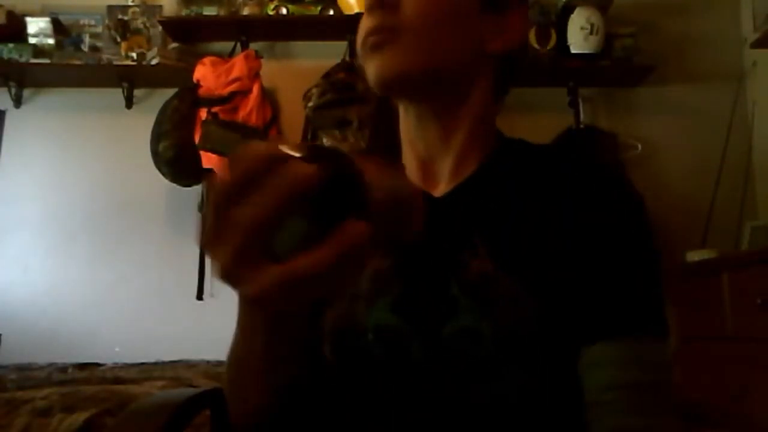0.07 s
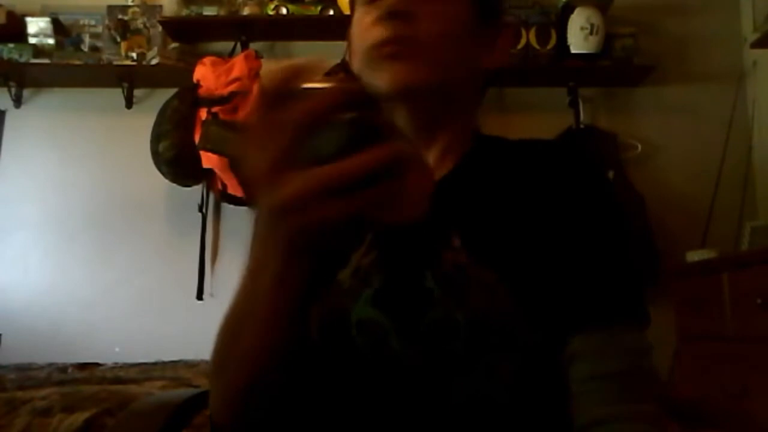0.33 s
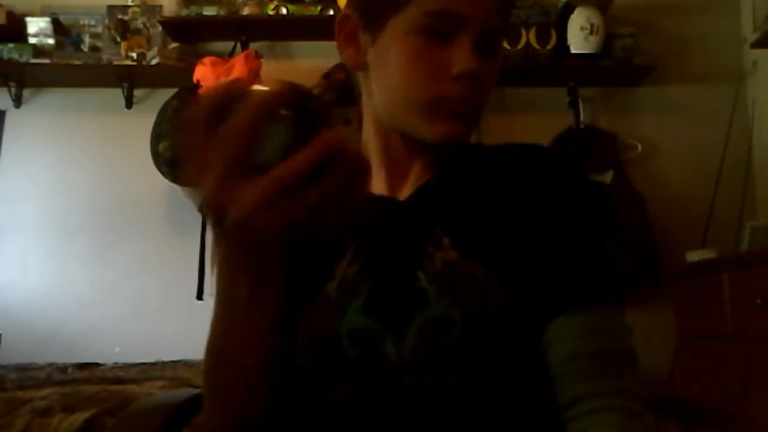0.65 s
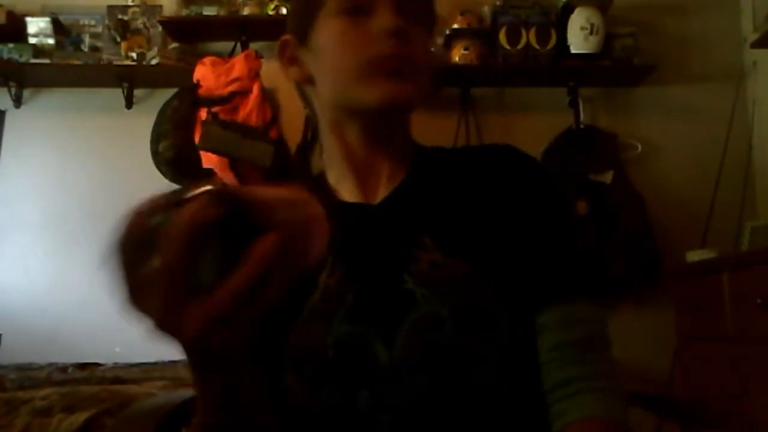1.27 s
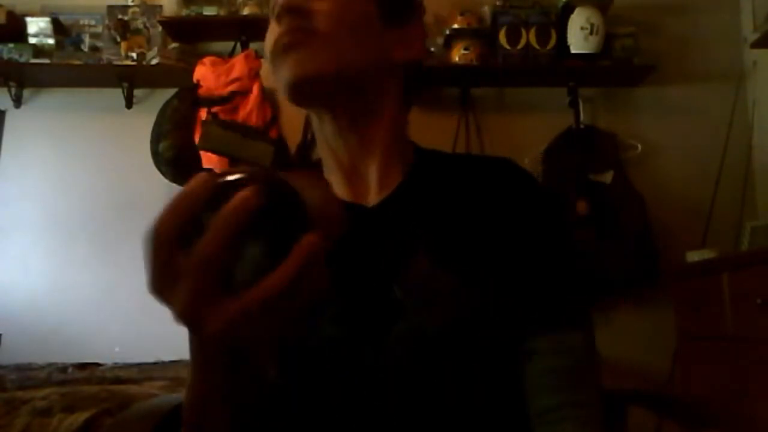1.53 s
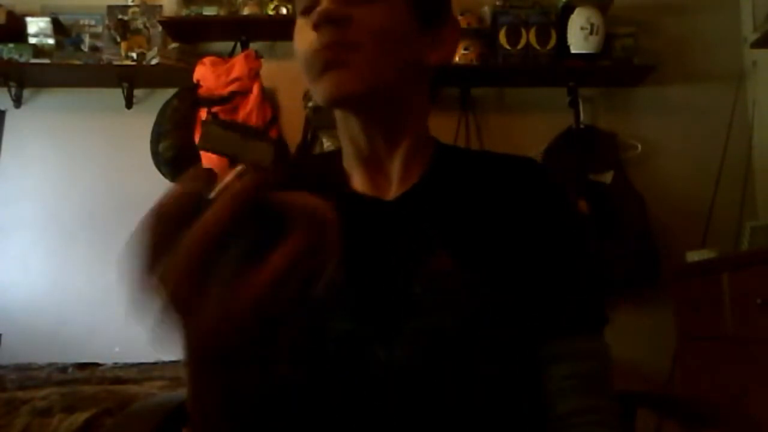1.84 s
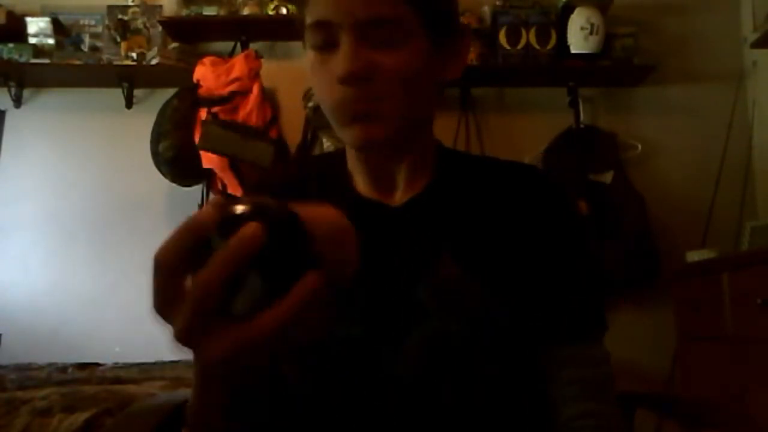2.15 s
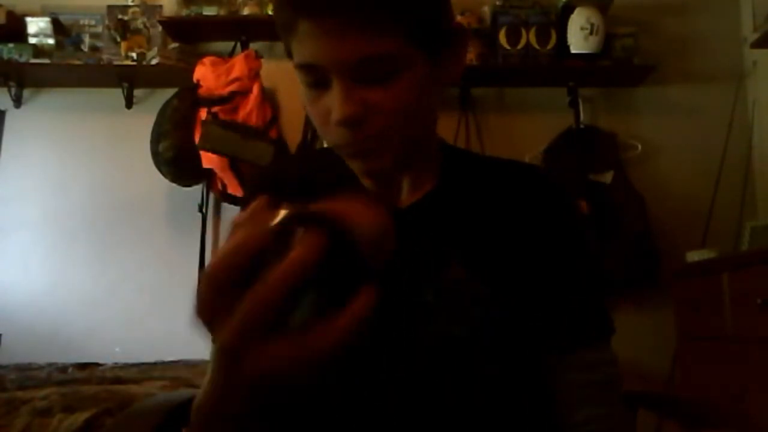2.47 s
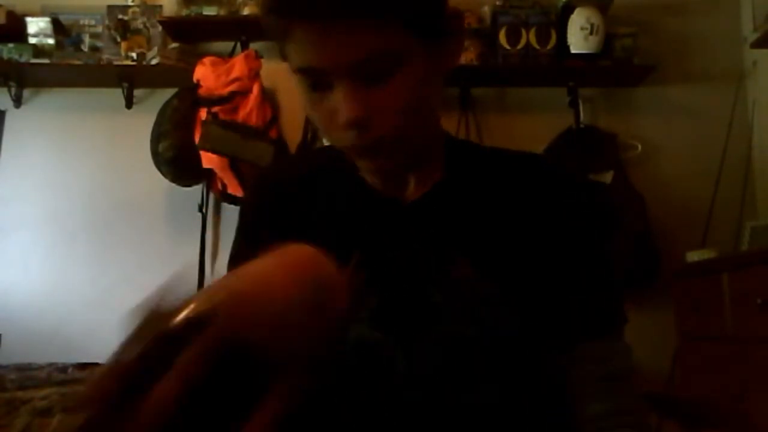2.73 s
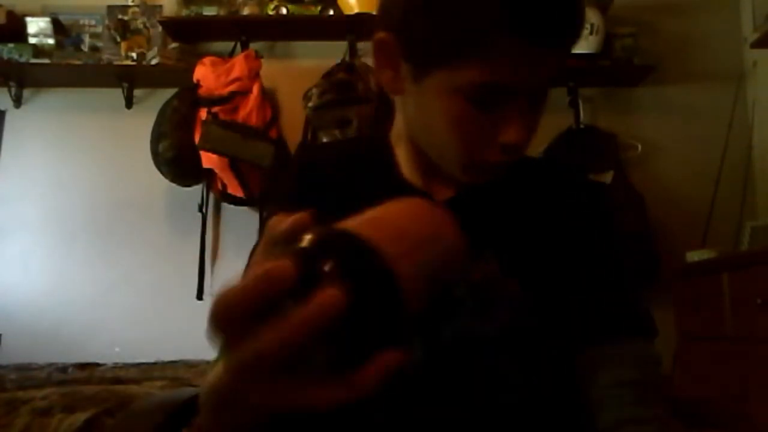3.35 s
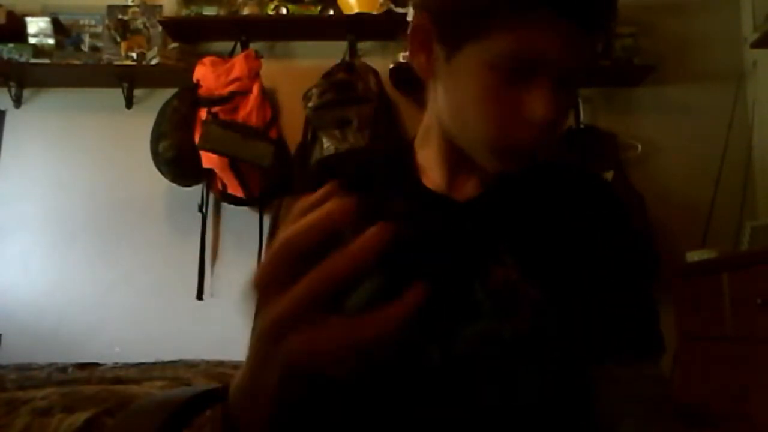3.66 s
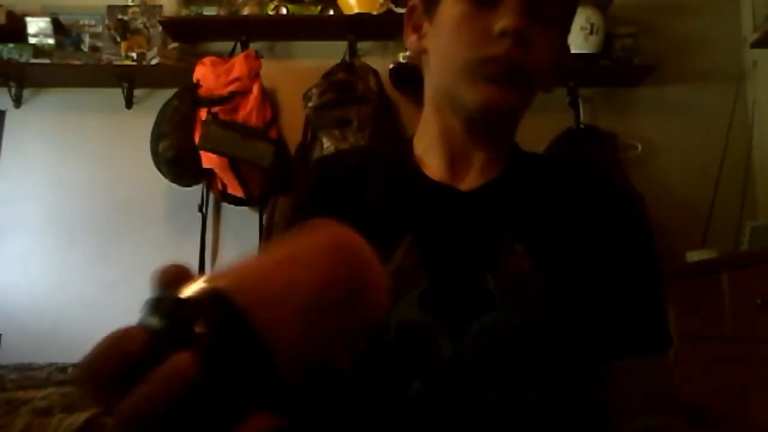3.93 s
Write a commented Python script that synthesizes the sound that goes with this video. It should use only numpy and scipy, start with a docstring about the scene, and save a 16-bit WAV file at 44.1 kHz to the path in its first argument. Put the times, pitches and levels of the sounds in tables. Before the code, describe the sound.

Rhythmic rattling and sloshing from a hand-held container shaken rapidly in a quiet room.

```python
"""A sharp, splashing rattle, about five times a second: a hand-held container shaken in a small, quiet room.
At each turn inertia throws the contents against one end, where many tiny impacts and a few hard knocks
excite the wall's resonance near 2 kHz. The return strokes are softer. Lower down, bubbles drive the
resonances of the liquid and the trapped air, which churn and gulp. Foam fizzes more and more and the hand
thumps now and then, over room noise, a low rumble and a faint sinking tone."""
import sys
import numpy as np
from scipy import signal
from scipy.fft import rfft, irfft
from scipy.io import wavfile
from scipy.ndimage import uniform_filter1d

SR = 44100
rng = np.random.default_rng(int(sys.argv[2]) if len(sys.argv) > 2 else 0)


def materialize(psi):
    """Save the field psi as 16-bit PCM at rate SR to the path in sys.argv[1].

    A 1-D psi becomes a single channel; in a 2-D psi each row is a channel.
    """
    bounded = np.clip(np.atleast_2d(psi).T, -1, 1)
    quanta = np.round(bounded * 32767).astype(np.int16)
    wavfile.write(sys.argv[1], SR, quanta)


N = 176400

# forward strokes: peak t/s, rise/s, fall/s, relative rattle level/dB, relative slosh level/dB, wall f/Hz
FORWARD_STROKES = [(0.07, 0.016, 0.032, -33, -55.5, 2055), (0.27, 0.0083, 0.014, -29, -54, 2110),
                   (0.449, 0.01, 0.02, -30.5, -53.5, 1900), (0.652, 0.01, 0.024, -35, -51.5, 1900),
                   (0.834, 0.011, 0.037, -37, -54, 2020), (1.027, 0.0093, 0.019, -33, -52, 1984),
                   (1.21, 0.0095, 0.02, -32.5, -67, 2010), (1.387, 0.013, 0.013, -33.5, -50.5, 2070),
                   (1.566, 0.011, 0.018, -36, -50, 2020), (1.734, 0.011, 0.022, -38.5, -52, 1970),
                   (1.888, 0.011, 0.023, -37, -48.5, 2000), (2.064, 0.012, 0.021, -33.5, -47, 2090),
                   (2.26, 0.035, 0.017, -38, -47, 1990), (2.423, 0.012, 0.019, -36.5, -51.5, 1980),
                   (2.595, 0.0052, 0.019, -33, -53, 1900), (2.768, 0.013, 0.021, -34, -51, 1970),
                   (2.951, 0.03, 0.025, -38.5, -49.5, 1940), (3.135, 0.014, 0.013, -36.5, -50, 2000),
                   (3.328, 0.011, 0.023, -35, -52.5, 2005), (3.528, 0.0068, 0.035, -35.5, -45, 1990),
                   (3.726, 0.0087, 0.024, -32, -46.5, 2010), (3.918, 0.0072, 0.024, -31, -51, 2070)]
# return strokes: peak t/s, rise/s, fall/s, relative rattle level/dB, relative slosh level/dB
RETURN_STROKES = [(0.178, 0.014, 0.036, -42, -53), (0.371, 0.005, 0.014, -40, -55.5),
                  (0.558, 0.012, 0.043, -45.5, -49), (0.747, 0.0036, 0.04, -41.5, -48.5),
                  (0.923, 0.012, 0.056, -41.5, -52), (1.129, 0.044, 0.033, -44.5, -54.5),
                  (1.309, 0.038, 0.017, -44, -53), (1.497, 0.026, 0.017, -42.5, -52.5),
                  (1.648, 0.0035, 0.046, -43.5, -52.5), (1.824, 0.0076, 0.018, -42, -56),
                  (1.985, 0.013, 0.027, -43, -51), (2.147, 0.015, 0.022, -44, -53),
                  (2.327, 0.021, 0.03, -39.5, -50), (2.502, 0.019, 0.048, -42, -49),
                  (2.691, 0.018, 0.024, -41.5, -57), (2.852, 0.011, 0.02, -42, -53),
                  (3.035, 0.0022, 0.018, -38.5, -56.5), (3.245, 0.029, 0.018, -40.5, -46.5),
                  (3.428, 0.0025, 0.034, -44, -50), (3.639, 0.011, 0.058, -46.5, -52),
                  (3.837, 0.0045, 0.038, -44, -51)]
RETURN_HZ, IMPACTS_PER_S = 1992, 2000
def rattle():
    """Superposition of impacts: at each turn heavy drops ring the wall and light spray ticks against it."""
    drops, power = np.zeros(N), np.zeros(N)
    t = np.arange(-SR // 8, SR // 4) / SR
    crest = .75  # saturation rounds the top of each splash
    for at, rise, fall, db, _, hz in list(FORWARD_STROKES) + [(*row, RETURN_HZ) for row in RETURN_STROKES]:
        force = undb(db + 2) * crest * np.tanh(swell(t, rise, fall) / crest)
        impacts = force * swarm(len(t), IMPACTS_PER_S, spread_db=4.5)
        add(drops, at + t[0], ring(impacts, wall(hz)))
        add(power, at + t[0], force ** 2)
    return drops + undb(-9.5) * np.sqrt(power) * spray()


# spectrum of a drop striking the wall: f/Hz, relative level/dB
WALL_SPECTRUM = [(200, -50), (500, -26.5), (1000, -20), (1400, -22), (1750, -3), (2000, -6.5), (2250, -4.5),
                 (2650, -10.5), (3600, -10.5), (4300, -13.5), (5400, -30.5), (8000, -37.5), (15000, -65)]
WALL_HZ, WALL_DECAY_S = 2019, .0045
def wall(hz):
    """Impulse response of the wall to one drop: a broadband clack plus one exponentially damped mode."""
    clack = response(WALL_SPECTRUM, hz / WALL_HZ)
    t = np.arange(len(clack)) / SR
    mode = np.exp(-t / WALL_DECAY_S) * np.cos(2 * np.pi * hz * t)
    return unit_energy(clack + undb(-8) * unit_energy(mode))


# hard blows on the wall: t/s, peak level/dB, wall f/Hz
KNOCKS = [(0.0668, -17.0, 2140.0), (0.0716, -19.0, 2140.0), (0.0757, -23.0, 2040.0),
          (0.1764, -27.5, 1890.0), (0.2686, -12.5, 1950.0), (0.272, -20.0, 2070.0), (0.4467, -16.0, 1850.0),
          (0.4564, -19.0, 1950.0), (0.6546, -24.0, 2030.0), (0.7445, -32, 1800), (0.831, -20.0, 2060.0),
          (0.8352, -15.0, 2140.0), (1.0239, -21.0, 2090.0), (1.0315, -20.0, 1980.0),
          (1.1286, -27.0, 2000.0), (1.1982, -25.0, 1970.0), (1.209, -19.0, 1990.0), (1.2123, -14.0, 2020.0),
          (1.5653, -25.0, 2000.0), (1.8205, -28.0, 2030.0), (1.9844, -30.0, 2100.0),
          (2.0622, -22.0, 2040.0), (2.242, -20.0, 2060.0), (2.3241, -28.0, 1850.0), (2.4197, -25.0, 1850.0),
          (2.5001, -26.0, 2210.0), (2.5059, -27.0, 1980.0), (2.5863, -26.0, 2020.0),
          (2.5946, -22.0, 1960.0), (2.599, -21.0, 2010.0), (2.7744, -22.0, 1950.0), (2.8486, -28.0, 2060.0),
          (3.0237, -30, 1920), (3.3128, -27.0, 1810.0), (3.7155, -21.0, 2000.0), (3.9145, -21.0, 1930.0)]
# spectrum of a hard blow: f/Hz, relative level/dB
KNOCK_SPECTRUM = [(200, -48), (800, -31), (1350, -16), (1700, -5.5), (2000, 11), (2300, 0.5), (2800, -20),
                  (3700, -1.5), (4600, -44), (5500, -22.5), (9000, -42), (16000, -71)]
CONTACT_S = .00035
def knocks():
    """Free vibration of the hand-damped wall after a blow; cushioning by the liquid softens the onset."""
    out = np.zeros(N)
    for at, db, hz in KNOCKS:
        knock = response(KNOCK_SPECTRUM, hz / WALL_HZ)
        t = np.arange(len(knock)) / SR
        knock *= 1 - np.exp(-(t / CONTACT_S) ** 2)
        add(out, at, undb(db) * knock / np.abs(knock).max())
    return out


# impacts of stray pieces: t/s, relative peak level/dB, f/Hz
TICKS = [(0.4289, -25, 3400), (0.5824, -38, 4500), (0.6409, -29, 3400), (0.755, -33, 4200),
         (1.0236, -21, 3740), (1.3683, -29, 3870), (1.6482, -32, 3600), (2.3057, -29, 3300),
         (2.5406, -30, 4600), (2.5858, -26, 3700), (2.7536, -25, 3600), (3.0929, -34, 3700),
         (3.2051, -31, 3050), (3.4291, -28, 3350), (3.489, -32, 3410), (3.5309, -27, 4230)]
# spectrum of a light impact: f/Hz, relative level/dB
TICK_SPECTRUM = [(600, -32), (2300, -12), (3500, 0), (4300, -7), (5400, -26), (8000, -42), (14000, -64)]
TICK_HZ = 3500
def ticks():
    """Impulse excitation: each light stray piece strikes once and gives a short, bright tick."""
    out = np.zeros(N)
    for at, db, hz in TICKS:
        tick = response(TICK_SPECTRUM, hz / TICK_HZ)
        add(out, at, undb(db - 1.5) * tick / np.abs(tick).max())
    return out


def spray(per_s=450, pitches=8, pitch_spread=.2):
    """Incoherent addition: sparse ticks of several pitches sum in power to an rms near 1."""
    shifts = 1 + pitch_spread * np.linspace(-1, 1, pitches)
    streams = (ring(swarm(N, per_s / pitches, spread_db=3.5), response(TICK_SPECTRUM, k)) for k in shifts)
    return sum(streams) / np.sqrt(pitches)


# modes of the churning liquid: f/Hz, bandwidth/Hz, relative level/dB
LIQUID_MODES = [(680.6, 74, -1), (788, 96, -1), (908, 95, -2), (986.5, 22, 2.5), (1005, 85, -2.5),
                (1195, 116, 3), (1292, 263, -1), (1640, 150, -5)]
BUBBLES_PER_S, BUBBLE_SPREAD_DB = 1400, 3.5
def slosh():
    """Forced vibration: bursting bubbles drive the modes of the liquid, hardest just after each stroke."""
    strength = surge(lag_s=.0028, rise_s=.016, fall_s=.018, churn_db=0)
    bubbles = strength * swarm(N, BUBBLES_PER_S, BUBBLE_SPREAD_DB)
    return ring(bubbles, resonances(LIQUID_MODES, low_hz=495, high_hz=2400))


# modes of the air above the liquid: f/Hz, bandwidth/Hz, relative level/dB
AIR_MODES = [(298, 18.5, -10.5), (390.2, 19.6, -4), (418, 23.5, -3.5), (478.6, 13.7, -0.5),
             (515.7, 14.2, 3.5), (586.8, 15.4, 5.5)]
# strength of the gulp relative to the slosh: t/s, level/dB
GULP_LEVEL = [(0, -1), (.8, -5.5), (1.6, -2), (2.1, -9.5), (2.4, -3.5), (4, -3)]
def gulps():
    """Cavity resonance: bubbles excite the trapped air, which answers with a hollow gulp."""
    strength = surge(lag_s=.0085, rise_s=.022, fall_s=.015, churn_db=-8) * gain_curve(GULP_LEVEL)
    bubbles = strength * swarm(N, BUBBLES_PER_S, BUBBLE_SPREAD_DB)
    return ring(bubbles, resonances(AIR_MODES, low_hz=270, high_hz=607))


# churning between strokes: t/s, relative level/dB
CHURN_LEVEL = [(0, -53.5), (1.5, -54), (3, -56.5), (4, -64.5)]
def surge(lag_s, rise_s, fall_s, churn_db):
    """Addition of powers: the amplitude of the liquid's sound, a swell per stroke over a fading churn."""
    t = np.arange(N) / SR
    power = (gain_curve(CHURN_LEVEL) * undb(churn_db)) ** 2
    for at, _, _, _, db, *_ in list(FORWARD_STROKES) + list(RETURN_STROKES):
        power += (undb(db + 1.5) * swell(t - at - lag_s, rise_s, fall_s)) ** 2
    return np.sqrt(power)


# clusters of large bubbles: t/s, f/Hz, level/dB
GLUGS = [(0.197, 690, -45), (0.778, 700, -46), (0.924, 1055, -43), (2.12, 1150, -43), (2.335, 690, -44),
         (3.143, 1080, -43.5), (3.35, 470, -49), (3.736, 1200, -45)]
def glugs(relative_bandwidth=.22):
    """Bubble resonance: large bubbles of about one size burst together and share one band of pitch."""
    out = np.zeros(N)
    t = np.arange(-SR // 16, SR // 8) / SR
    for at, hz, db in GLUGS:
        mode = resonances([(hz, relative_bandwidth * hz, 0)], hz / np.sqrt(2), hz * np.sqrt(2))
        bubbles = unit_rms(ring(swarm(len(t), BUBBLES_PER_S, BUBBLE_SPREAD_DB), mode))
        add(out, at + t[0], undb(db) * swell(t, rise_s=.008, fall_s=.016) * bubbles)
    return out


# spectrum of the foam's crackle: f/Hz, relative level/dB
FIZZ_SPECTRUM = [(2000, -20), (4500, -1), (6500, 0), (8500, -2), (11000, -12), (16000, -36)]
# strength of the foam relative to the stroke: t/s, level/dB
FOAM_LEVEL = [(0, -38), (1.2, -34.5), (2.1, -29), (2.6, -27.5), (3.55, -29), (4, -25.5)]
def fizz():
    """Shot noise: foam builds up with the shaking and crackles in fine random pulses at each stroke."""
    t = np.arange(N) / SR
    strokes = list(FORWARD_STROKES) + list(RETURN_STROKES)
    force = sum(undb(db) * swell(t - at, rise_s=.016, fall_s=.025) for at, _, _, db, *_ in strokes)
    crackle = swarm(N, per_s=2500, spread_db=6) * force * gain_curve(FOAM_LEVEL)
    return ring(crackle, response(FIZZ_SPECTRUM))


# bumps of the arm and hand: t/s, half-width/s, level/dB
THUMPS = [(0.108, 0.0089, -51), (0.258, 0.012, -50), (0.3, 0.046, -56), (2.149, 0.02, -51),
          (2.233, 0.012, -54.5), (2.626, 0.02, -55.5), (2.96, 0.01, -55), (3.546, 0.012, -60)]
# spectrum of a bump: f/Hz, relative level/dB
THUMP_SPECTRUM = [(30, -38), (60, -22), (85, -5), (125, 0), (175, -7), (260, -16), (800, -50)]
def thumps():
    """Soft impacts carry mainly low frequencies: the moving arm gives dull Gaussian pulses of noise."""
    t = np.arange(N) / SR
    push = sum(undb(db) * np.exp(-((t - at) / half_width) ** 2) for at, half_width, db in THUMPS)
    return push * noise(THUMP_SPECTRUM)


# course of the faint tone: t/s, f/Hz, level/dB
TONE = [(.45, 815, -62), (.6, 798, -54.5), (1.3, 788, -63), (1.5, 765, -83)]
def faint_tone(pitch_spread=.0093, flicker_db=4):
    """Random frequency and amplitude modulation: a sinking sinusoid wavers and flickers."""
    t = np.arange(N) / SR
    times, hz, db = np.array(TONE).T
    pitch = np.interp(t, times, hz) * (1 + pitch_spread * drift())
    amplitude = np.interp(t, times, undb(db), left=0, right=0) * undb(flicker_db * drift())
    return amplitude * np.sin(2 * np.pi * np.cumsum(pitch) / SR)


# fading of the rumble: t/s, level/dB
RUMBLE_LEVEL = [(0, -62.5), (4, -71.5)]
# spectrum of the rumble: f/Hz, relative level/dB
RUMBLE_SPECTRUM = [(40, -40), (85, -0.5), (110, -4.5), (138, 0), (195, -2), (250, -18), (500, -35)]
# spectrum of the room noise: f/Hz, relative level/dB
HUSH_SPECTRUM = [(25, -28), (85, -7), (200, -12), (350, -20.5), (600, -10.5), (2000, -2), (4000, -5.5),
                 (6000, -23.5), (10000, -35), (16000, -35)]
def background():
    """Ambient noise floor: a fading low rumble under the steady broadband hush of the room."""
    return gain_curve(RUMBLE_LEVEL) * noise(RUMBLE_SPECTRUM) + undb(-56) * noise(HUSH_SPECTRUM)


def room(x, t60_s=.14, tail_delay_s=.017, tail_db=-16.5, ceiling_s=.0102, ceiling_db=-21):
    """Reverberation: the direct sound, one ceiling reflection and an exponentially decaying diffuse tail."""
    t = np.arange(SR // 2) / SR
    tail = rng.standard_normal(len(t)) * undb(-60 * t / t60_s) * (t > tail_delay_s)
    echoes = undb(tail_db) * unit_energy(tail)
    echoes[int(ceiling_s * SR)] += undb(ceiling_db)
    return x + ring(x, echoes)


def resonances(modes, low_hz, high_hz):
    """Modal superposition: damped cosines of alternating sign, band-limited, with unit energy."""
    t = np.arange(SR // 8) / SR
    h = sum((-1) ** k * undb(db) * width * np.exp(-np.pi * width * t) * np.cos(2 * np.pi * hz * t)
            for k, (hz, width, db) in enumerate(modes))
    band = signal.butter(2, [low_hz, high_hz], "band", fs=SR, output="sos")
    return unit_energy(signal.sosfilt(band, h))


def response(spectrum, shift=1, size=1024):
    """Minimum-phase impulse response of a spectrum, its frequencies scaled by shift, with unit energy."""
    hz, db = np.array(spectrum).T
    f = np.maximum(np.arange(size // 2 + 1) * SR / size, 1)
    magnitude = undb(np.interp(np.log(f), np.log(hz * shift), db))
    cepstrum = irfft(np.log(magnitude))
    cepstrum[1:size // 2] *= 2  # folding onto positive time makes the response causal
    cepstrum[size // 2 + 1:] = 0
    return unit_energy(irfft(np.exp(rfft(cepstrum))))


def swarm(count, per_s, spread_db):
    """Poisson process: independent impulses of random size and sign, rms 1."""
    chance, size, side = rng.random(count), rng.standard_normal(count), rng.standard_normal(count)
    return unit_rms((chance < per_s / SR) * undb(spread_db * np.clip(size, -2, 2)) * np.sign(side))


def noise(spectrum):
    """Spectral shaping of white noise, rms near 1."""
    return ring(rng.standard_normal(N), response(spectrum, size=4096))


def drift():
    """Moving averages smooth white noise into a slow fluctuation, rms 1."""
    return unit_rms(uniform_filter1d(uniform_filter1d(rng.standard_normal(N), size=1100), size=700))


def swell(t, rise_s, fall_s):
    """Exponential growth up to time zero, then exponential decay."""
    return np.exp(-np.where(t < 0, -t / rise_s, t / fall_s))


def gain_curve(levels):
    """Amplitude envelope interpolated through points of t/s, level/dB."""
    return undb(np.interp(np.arange(N) / SR, *np.array(levels).T))


def ring(x, h):
    """Convolution of a sound with an impulse response."""
    return signal.fftconvolve(x, h)[:len(x)]


def add(out, start_s, x):
    """Superpose a sound at a given time."""
    i = int(start_s * SR)
    a, b = max(i, 0), min(i + len(x), N)
    out[a:b] += x[a - i:b - i]


def undb(db):
    """Decibels to amplitude ratio."""
    return 10 ** (np.asarray(db) / 20)


def unit_rms(x):
    """Normalise to rms 1."""
    return x / np.sqrt(np.mean(x ** 2) + 1e-20)


def unit_energy(h):
    """Normalise to energy 1."""
    return h / np.linalg.norm(h)


def scene():
    """Linear superposition: the container with its reverberation, the thumps and the background, in mono."""
    container = rattle() + knocks() + ticks() + slosh() + gulps() + glugs() + fizz()
    return (room(container) + thumps() + faint_tone() + background())[None]


def record(dry, cutoff_hz=15900):
    """Band limiting: a steep elliptic low-pass removes the highest treble."""
    return signal.sosfilt(signal.ellip(10, .1, 70, cutoff_hz, fs=SR, output="sos"), dry)


dry = scene()
out = record(dry)
materialize(out)
```